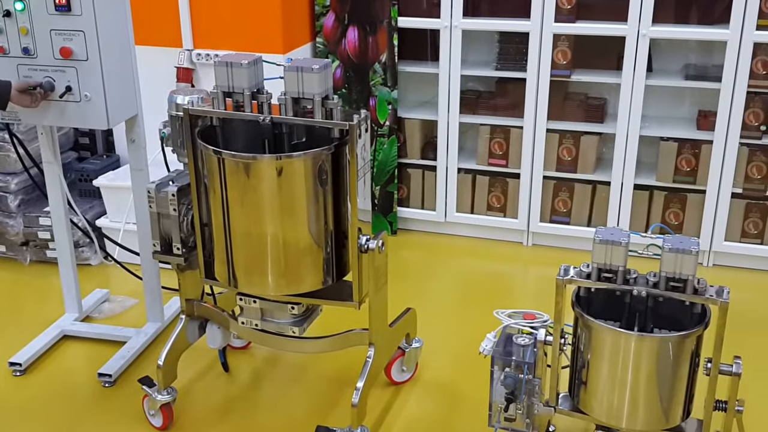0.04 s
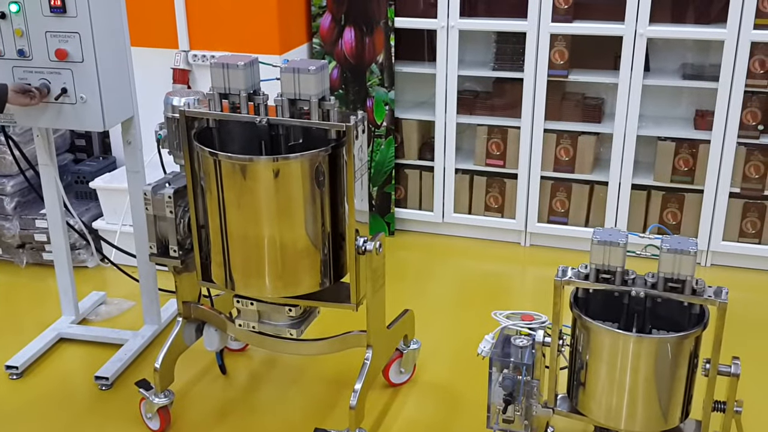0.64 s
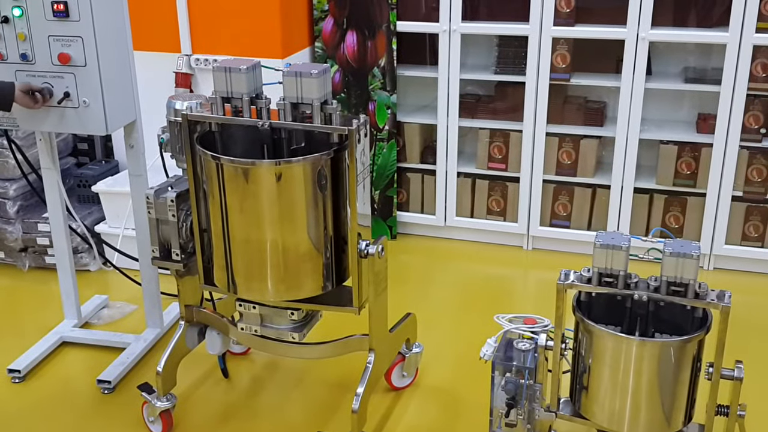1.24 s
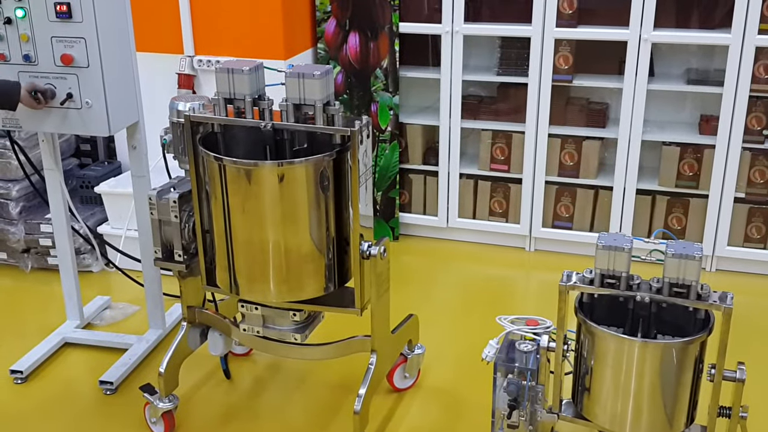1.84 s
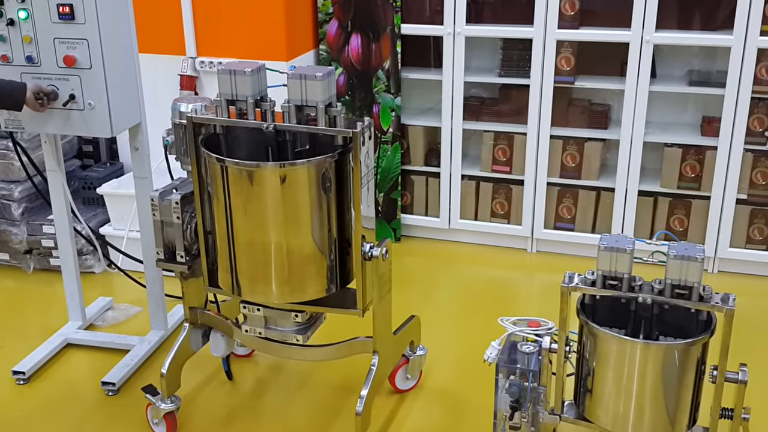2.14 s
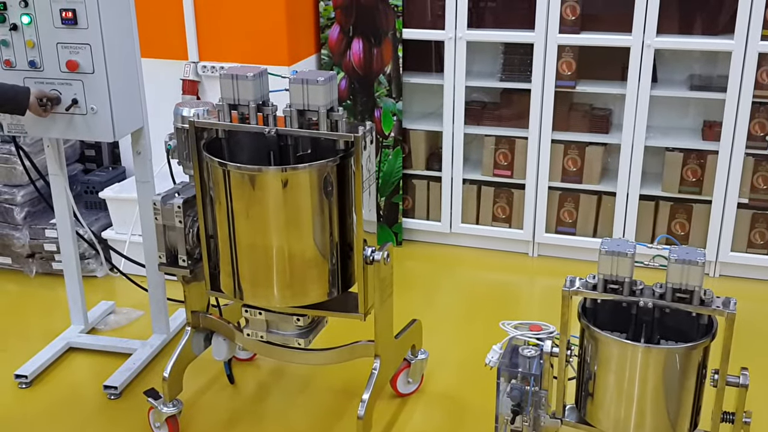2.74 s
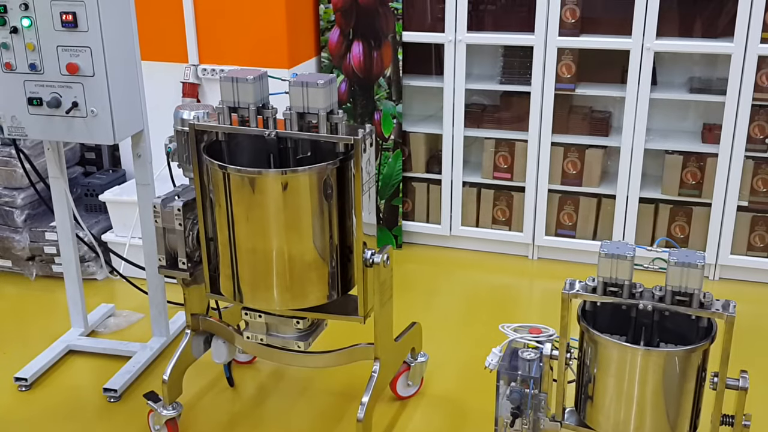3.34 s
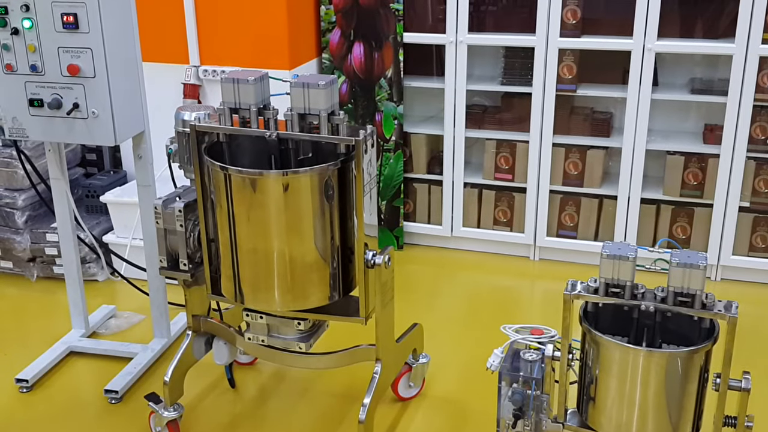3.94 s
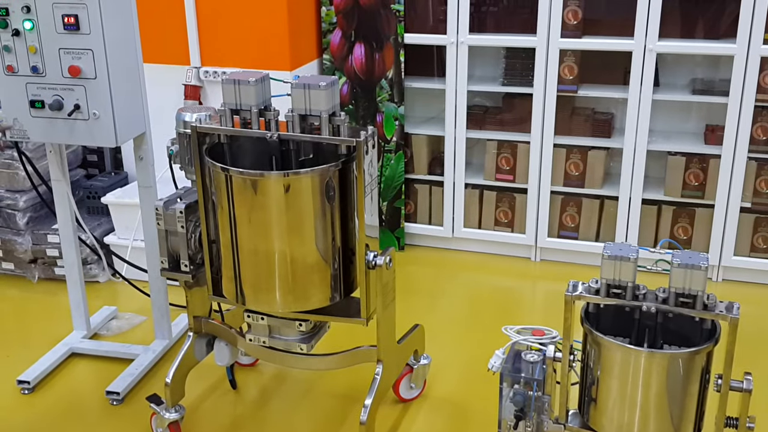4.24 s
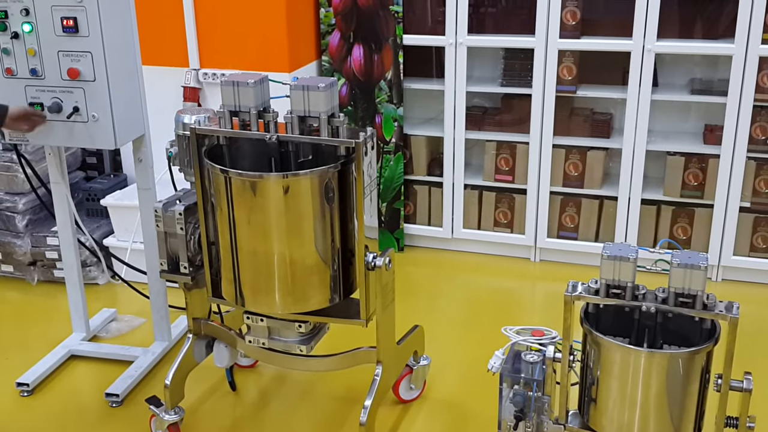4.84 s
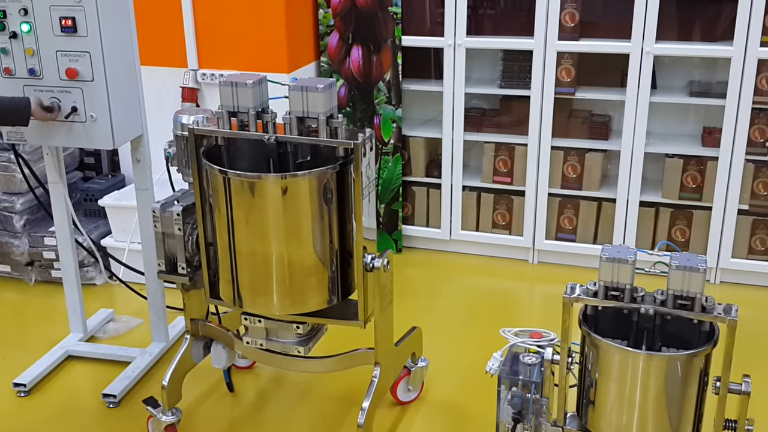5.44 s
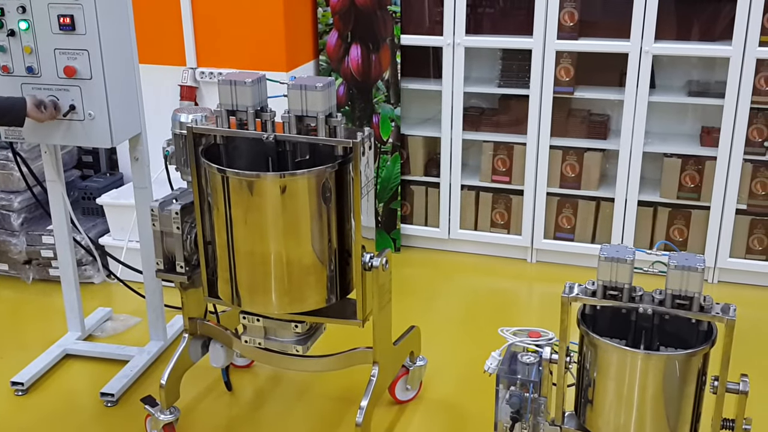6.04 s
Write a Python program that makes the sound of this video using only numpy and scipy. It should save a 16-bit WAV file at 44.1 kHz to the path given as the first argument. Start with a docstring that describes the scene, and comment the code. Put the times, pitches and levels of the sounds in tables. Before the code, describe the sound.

Heard from a few steps away in a showroom, a grinding machine makes a continuous low, ringing drone that pulses slightly as its steel drum turns. Paste hisses under the stone rollers and the motor gives off a very high whine, toward the right. Short, dry bearing squeaks come and go. Near the end, a quick cluster of cracking knocks comes with a faint rustle while the machine keeps running.

```python
"""In a showroom, a stone chocolate grinder runs a few steps from the microphone.
Granite rollers excite the resonances of a turning steel drum and its stand; the rumble swells about
every 0.7 s, over the hiss of sheared paste and the knock of breaking nibs. The motor's inverter whines
near 9.5 kHz from the right, a dry bearing chirps now and then, and soft rustles come late."""
import sys
import numpy as np
from scipy import signal
from scipy.fft import rfft, irfft
from scipy.io import wavfile
from scipy.ndimage import uniform_filter1d

SR = 44100
rng = np.random.default_rng(int(sys.argv[2]) if len(sys.argv) > 2 else 0)


def persist_wave(psi):
    """Save psi, clipped to +-1, as 16-bit WAV."""
    counts = np.round(np.clip(psi, -1, 1) * 32767).astype(np.int16)
    wavfile.write(sys.argv[1], SR, np.atleast_2d(counts).T)


N = 273420
T, HZ = np.arange(N) / SR, np.fft.rfftfreq(N, 1 / SR)


def amp(db):
    """Amplitude ratio of a level in decibels."""
    return 10 ** (np.asarray(db) / 20)


def unit(x):
    """Normalisation to rms 1."""
    return x / np.sqrt(np.mean(x ** 2) + 1e-20)


def at_hz(points, hz):
    """Interpolation on a log-frequency axis."""
    f, value = np.transpose(points)
    return np.interp(np.log(hz + 1), np.log(f + 1), value)


def curve(points):
    """Linear interpolation in time."""
    return np.interp(T, *np.transpose(points))


def drift(rate_hz):
    """Low-pass random fluctuation of rms 1."""
    return unit(irfft(rfft(rng.standard_normal(N)) * np.exp(-(HZ / rate_hz) ** 2) * (HZ > 0), N))


def band_noise(hz, width_hz, shape=N):
    """Noise in a Gaussian band, of rms 1."""
    return unit(irfft(rfft(rng.standard_normal(shape)) * np.exp(-((HZ - hz) / width_hz) ** 2), N))


# balance of the two microphone ports (frequency [Hz], left minus right [dB])
BALANCE = [(60, 0.5), (220, -1.5), (350, -1), (500, 0), (1100, -1), (1500, -3.5), (2100, -7), (2900, -1.5),
           (4400, -5), (5400, -5.5), (6500, -25), (10500, -15), (11800, -1), (15000, -4.5)]
def ports(hz):
    """Level difference as left and right gains: the treble favours the right."""
    side = amp(at_hz(BALANCE, hz))
    return np.array([side, np.ones_like(side)]) / np.sqrt((1 + side ** 2) / 2)


# likeness of the ports (frequency [Hz], coherence [0 to 1])
COHERENCE = [(60, .993), (150, .99), (235, .97), (320, .86), (500, .77), (800, .55), (1200, .25),
             (3000, .15), (15000, .1)]
def noise(colour, lead_s=0.0002705, lead_above_hz=1070):
    """Partial coherence: stereo noise is alike in the bass and diffuse in the treble."""
    left, independent = rfft(rng.standard_normal((2, N)))
    same = np.clip(at_hz(COHERENCE, HZ), 0, 1)
    lag_s = lead_s * (1 - np.exp(-(HZ / lead_above_hz) ** 4))  # the left leads, except in the bass
    right = (same * left + np.sqrt(1 - same ** 2) * independent) * np.exp(-2j * np.pi * HZ * lag_s)
    pair = irfft(np.array([left, right]) * ports(HZ) * colour, N)
    return pair / pair.mean(0).std()


def ringing(modes, steadiness):
    """Forced resonance: random contact forces drive modes; steady rolling evens out the surges."""
    power = sum(amp(db) ** 2 / (1 + ((HZ - hz) / width) ** 2) ** 2 for hz, width, db in modes)
    radiation = 1 - np.exp(-(HZ / 36) ** 2)  # weak in the deep bass
    pair = noise(np.sqrt(power) * radiation)
    surge = uniform_filter1d(uniform_filter1d(pair.mean(0) ** 2, size=3500), size=2500)
    return pair / surge ** (steadiness / 2)


def wandering(pair, share):
    """Frequency modulation: modes slide by a share of their pitch as the rollers shift on the paste."""
    place = np.arange(N) + np.cumsum(share * drift(rate_hz=3.54))
    return np.array([np.interp(place, np.arange(N), side, period=N) for side in pair])


# the rollers bearing down (start [s], end [s], load while held [dB], load after [dB])
TURNS = [(0.007, 0.245, 1.5, -0.9), (.52, 1.29, 0.6, -2), (1.48, 1.92, 1.4, -3), (2.176, 2.565, 2, -4),
         (2.832, 3.203, 2, -4.5), (3.527, 3.91, 2, -4), (4.214, 4.675, 1.5, -3.5),
         (5.017, 5.293, 3.5, -2.5), (5.695, 5.915, 2.5, -0.7)]
LAG_S = 0.027  # hubs and paste trail the load
def load(lag_s=0, build_s=0.063, release_s=0.084):
    """Cyclic loading, in relative dB: once a turn the load builds, holds and lets go."""
    load_db = last_db = TURNS[0][3]
    for start, end, held_db, slack_db in TURNS:
        build = (1 + np.tanh((T - lag_s - start) / build_s)) / 2
        release = (1 + np.tanh((T - lag_s - end) / release_s)) / 2
        load_db = load_db + (held_db - last_db) * build + (slack_db - held_db) * release
        last_db = slack_db
    return load_db


# modes of the stones and of their hubs (frequency [Hz], width [Hz], relative level [dB])
STONE_MODES = [(444.5, 16, -1), (424, 18, -7), (478.8, 15.7, 1), (514, 15, -5), (540, 28, -10),
               (554.4, 17, -1.5), (613, 17, -10.5), (619, 43, -5.5), (666, 17.5, -7.5)]
HUB_MODES = [(713, 49, 0.5), (778, 94, -0.5), (817, 20, 2), (894, 9, 3.5), (920, 4.3, -4.5), (994, 85, -7)]
def rollers():
    """Rolling contact: stone on stone swells with the load; the stiffer hubs resonate higher."""
    stones = wandering(ringing(STONE_MODES, steadiness=0.23), share=0.01402)
    hubs = ringing(HUB_MODES, steadiness=0.3)
    return amp(-31.5 + 1.2 * load()) * stones + amp(-38.5 + 0.5 * load(LAG_S)) * hubs


# the drum's two main resonances (frequency [Hz], width [Hz], relative level [dB])
BOOM_MODES = [(217.8, 3.8, 7.7), (232.7, 17.4, 14), (252, 25, 0.46)]
RING_MODES = [(282, 14.3, -3.5), (320, 10.7, 0.5), (331.4, 21, -3), (350.4, 11, -3), (378.8, 17.7, -1.5)]
# roller jolts (time [s], half length [s], boom rise [dB], ring rise [dB])
JOLTS = [(0.16, 0.13, 5, -1), (0.805, 0.14, 1.5, 2.5), (1.058, 0.04, 7.5, 2), (1.216, 0.089, 2, 2.5),
         (1.734, 0.029, 6.5, 6), (1.957, 0.023, 6, 2), (2.345, 0.039, -3, 6.5), (3.17, 0.3, 4.5, 1),
         (3.786, 0.05, 2, 5), (3.997, 0.08, 7, 4.5), (4.59, 0.078, 8.5, -3), (4.7, 0.066, 7.5, -0.5),
         (5.253, 0.044, -4, 8.5)]
def drum():
    """Shell resonance: the drum booms and rings, flaring when a roller jolts it."""
    boom_db, ring_db = sum(np.outer(rises_db, np.exp(-((T - s) / length) ** 2))
                           for s, length, *rises_db in JOLTS)
    boom = ringing(BOOM_MODES, steadiness=0.43)
    ring = wandering(ringing(RING_MODES, steadiness=0.067), share=0.012)
    return amp(-36 + boom_db + 0.053 * load()) * boom + amp(-31.5 + ring_db + load()) * ring


# modes of the stand (frequency [Hz], width [Hz], relative level [dB])
STAND_MODES = [(48.3, 3, -19), (69.6, 9.1, -8.5), (94, 18, -10), (109, 12, -2.5), (134.7, 5.8, 3.5),
               (146, 23, -6.5), (172.2, 8.4, 2), (175, 4.3, 0), (200, 5.3, -0.5)]
# its rumble before the load acts (time [s], level [dB])
RUMBLE = [(0, -41), (.28, -36), (.58, -44.5), (.9, -40.5), (1.8, -39.3), (2.7, -41), (3.3, -39.5),
          (3.7, -42), (4.5, -38.5), (4.95, -43), (6.2, -39.5)]
def stand():
    """Structure-borne vibration: the rollers shake the stand's low modes."""
    return amp(curve(RUMBLE) + 0.21 * load()) * ringing(STAND_MODES, steadiness=0.16)


# spectrum of the paste's hiss (frequency [Hz], relative density [dB])
PASTE_SPECTRUM = [(60, -50), (500, -54), (950, 1.5), (1150, 1), (1400, 0), (1650, -1), (2200, 0),
                  (2800, -4), (3250, -10), (3800, -11.5), (4300, -16.5), (5500, -17.5), (7000, -30),
                  (10000, -51)]
# its rasp before load and grit act (time [s], level [dB])
RASP = [(0, -40.5), (.32, -42.5), (1.15, -41.5), (2.05, -41.5), (2.43, -41), (2.9, -41.5), (4.1, -41.5),
        (4.72, -40), (5.15, -41), (5.65, -41.5), (6.2, -41)]
def paste():
    """Shear noise: the paste hisses a little louder under load, and grit makes it flutter."""
    level_db = curve(RASP) + 0.23 * load(LAG_S) + 0.5 * drift(rate_hz=31)
    return amp(level_db) * noise(amp(at_hz(PASTE_SPECTRUM, HZ)))


# modes of thin steel parts (frequency [Hz], width [Hz], relative level [dB])
STEEL_MODES = [(3540, 53, 3.5), (3940, 29, 6), (4600, 260, 1.5), (5430, 26, -1.5), (5690, 15, 6.5),
               (6240, 66, 2), (8100, 120, -9)]
def steel():
    """Forced vibration: the gears set thin steel humming."""
    return amp(-58.5) * ringing(STEEL_MODES, steadiness=0.1)


# larger nibs cracking (time [s], level [dB])
LARGE_NIBS = [(2.848, -22), (3.332, -24), (3.989, -18), (5.71, -18), (5.728, -12), (5.761, -15),
              (5.806, -21), (5.844, -18)]
def nibs(per_s=45, small_db=-35.5, crack_db=-18):
    """Impulse response: cocoa nibs break, more often under load, and each knock rings the stones."""
    chance = per_s / SR * amp(load()) ** 2
    knocks = (rng.random(N) < chance) * amp(small_db + 3.7 * np.clip(rng.standard_normal(N), -2, 1.5))
    for s, db in LARGE_NIBS:
        knocks[round(s * SR)] = amp(db)
    t, place = T[:SR // 8], rng.integers(0, 8, N)
    crack_band = signal.butter(2, [800, 3200], "band", fs=SR)
    out = np.zeros((2, N))
    for spot in range(8):  # each place on the drum's floor rings its own mix of modes
        ring = 0
        for hz, width, db in STONE_MODES:
            weight = amp(db) * (rng.standard_normal() + 1.46 * rng.standard_normal((2, 1)))
            ring += weight * np.sin(2 * np.pi * hz * t) * np.exp(-2 * np.pi * width * t)
        crack = signal.lfilter(*crack_band, rng.standard_normal((2, len(t))) * np.exp(-t / 0.0048))
        knock = ring / abs(ring).max() + amp(crack_db) * crack / abs(crack).max()
        out += signal.oaconvolve((knocks * (place == spot))[None], knock, axes=1)[:, :N]
    # the knocks carry no deep bass
    return signal.lfilter(*signal.butter(2, 220, "high", fs=SR), out)


def tone(hz, db, start_rad, wander_rad, flutter_db, left_db=-6):
    """Multipath: only reflections of a tone reach the left port; moving parts make both sides waver."""
    path_rad = np.array([[rng.uniform(0, 2 * np.pi)], [0]])
    phase = 2 * np.pi * hz * T + start_rad + path_rad + wander_rad * drift(rate_hz=11)
    left, right = ports(hz)
    gains = np.array([[amp(left_db) * left / right], [1]])
    return np.sqrt(2) * amp(db + flutter_db * drift(rate_hz=7.5)) * np.sin(phase) * gains


# switching sidebands (carrier multiple, offset [mains multiples]) and, for each, (base level [dB])
SIDEBANDS = [(1, -5), (1, -3), (1, -1), (1, 1), (1, 3), (1, 5), (2, -12), (2, -8), (2, -6), (2, -4),
             (2, -2), (2, 0), (2, 2), (2, 4), (2, 6), (2, 8), (3, -7), (3, 3), (3, 11)]
SIDEBAND_LEVELS = [-63, -57.5, -52, -60.5, -59.5, -62.5, -66, -58, -52, -54, -49, -56, -44, -44, -41, -55,
                   -71, -76, -75]
# contour, centred and scaled below, of the group at twice the carrier (time [s], level [dB])
WHINE_CONTOUR = [(0.0, -48.5), (0.48, -46.5), (0.95, -47.5), (1.45, -47.5), (1.9, -45.5), (3.25, -45.5),
                 (3.55, -47), (3.7, -46), (4.3, -46.5), (4.7, -48), (5.33, -51.5), (5.7, -48.5), (6.2, -49)]
# the hand-held microphone drifts through standing waves (time [s], place [-1 to 1])
SWAY = [(0, -1), (.55, .4), (1.45, 1), (2.2, 0.17), (3.3, -1), (4.2, -0.39), (4.85, -0.61), (5.3, -.2),
        (5.7, 0.8), (6.2, .5)]
# sidebands this affects (offset [mains multiples]) and, for each, (gain at place 1 [dB])
SWAYED_OFFSETS = [-6, -4, -2, 2, 4]
SWAY_GAINS = [1, -6, 4, 1.5, -1]
def inverter(carrier_hz=4690.75, mains_hz=50, twist_rad=0.292):
    """Modulation: windings sing at multiples of the switching rate, split into sidebands by the mains."""
    contour_db, sway = curve(WHINE_CONTOUR), curve(SWAY)
    swell_db = 0.82 * (contour_db - contour_db.mean())
    sway_db = dict(zip(SWAYED_OFFSETS, SWAY_GAINS))
    out = np.zeros((2, N))
    for (multiple, offset), db in zip(SIDEBANDS, SIDEBAND_LEVELS):
        hz = multiple * carrier_hz + offset * mains_hz
        # the mains sweeps the pulse width, so the whine swings in pitch more than in level
        start_rad = twist_rad * offset ** 2
        if multiple == 2:
            level_db = db - 0.6 + swell_db + sway * sway_db.get(offset, 0)
            out += tone(hz, level_db, start_rad, wander_rad=0.2, flutter_db=0.8, left_db=-5)
        else:
            out += tone(hz, db - 0.5, start_rad, wander_rad=0.31, flutter_db=0.5, left_db=-5.5)
    return out


def shadow(late_s, turn_s=0.705, dip_at_s=0.82, depth_db=-6):
    """Acoustic shadow, in dB about its mean: the drum shades a tone once a turn."""
    dip = np.cos(np.pi * (T - dip_at_s - late_s) / turn_s) ** 6
    return depth_db * (dip - dip.mean())


# steady motor tones (frequency [Hz], base level [dB])
MOTOR_TONES = [(1759, -59), (2310.8, -61), (2795.3, -60), (2954.1, -61), (4565, -67), (4865.2, -62),
               (5345.6, -64), (6293, -67.5), (6886.6, -67), (7085.8, -69), (7286.3, -64), (8306.4, -60),
               (8599.8, -59), (8706.1, -61), (8799, -61), (9105, -65), (9531.1, -62), (9632, -64),
               (9657.6, -59), (9739.7, -64), (9797.6, -60), (9862.2, -55), (9912, -67), (9970, -66),
               (10061, -68), (10161, -69), (10261, -71), (10463.8, -64), (14406, -77), (14546, -78)]
# two thin whines that come and go (time [s], level [dB])
LOW_WHINE = [(0, -49), (.28, -58), (.48, -56), (.8, -57), (1.0, -59), (1.4, -55), (1.56, -64), (2.05, -53),
             (2.28, -66), (2.66, -56.5), (2.82, -62), (2.97, -53), (3.15, -63), (3.5, -68), (3.68, -55),
             (3.95, -65), (4.75, -65), (4.9, -54.5), (5.15, -70), (5.56, -55), (5.72, -61), (6.15, -54.5)]
HIGH_WHINE = [(0, -58), (1.3, -66), (1.9, -59), (2.6, -55), (3.4, -50), (4.05, -53.5), (4.7, -61),
              (6.2, -62)]
def motors(low_hz=5321.4, high_hz=8899.9):
    """Tonal radiation: faint motor tones, all but the low whine shaded by the turning drum."""
    tones = np.zeros((2, N))
    for hz, db in MOTOR_TONES:
        level_db = db - 0.5 + shadow(late_s=0.11 * rng.standard_normal())
        tones += tone(hz, level_db, rng.uniform(0, 2 * np.pi, (2, 1)), wander_rad=0.33, flutter_db=3)
    low = tone(low_hz, curve(LOW_WHINE), 0, wander_rad=0.35, flutter_db=2.5, left_db=-13)
    high_db = curve(HIGH_WHINE) + 1.4 * shadow(late_s=0.044)
    high = tone(high_hz, high_db, 0, wander_rad=0.25, flutter_db=2.3, left_db=-10)
    return tones + low + high


# spectrum of the background hiss (frequency [Hz], relative density [dB])
HISS_SPECTRUM = [(20, -23), (60, -7), (300, 11.5), (1000, 11.5), (3000, -0.5), (5000, -3.5), (7400, -1.5),
                 (8300, 3.5), (9700, 4.5), (10400, -5), (10950, -22), (11600, -17.5), (12500, -13.5),
                 (14500, -8), (15500, -18)]
def background_hiss():
    """Broadband noise: a steady hiss, with a gap near 11 kHz that is not the machine's sound."""
    return amp(-45) * noise(amp(at_hz(HISS_SPECTRUM, HZ)))


# showroom echoes (delay [s], level [dB])
ECHOES = [(.0065, 2), (.025, -7), (.051, -1.5), (.088, -11)]
def room(x, t60, tail_db, spread_s=0.0004):
    """Reverberation: echoes from floor, walls and glass doors, over a diffuse tail."""
    t = T[:SR]
    tail = rng.standard_normal((2, SR)) * np.exp(-np.log(1000) * t / t60) * (t > 0.012)
    wet = x.std() * amp(tail_db) * unit(signal.fftconvolve(x[None], tail, axes=1)[:, :N])
    for s, db in ECHOES:
        for side in wet:
            delay = round((s + spread_s * rng.random()) * SR)
            side[delay:] += amp(db) * x[:N - delay]
    return wet


# bearing slips (time [s], squeal level [dB], clank level [dB])
SLIPS = [(.204, -41.5, -49), (.318, -36, -43), (.836, -43, -56), (1.052, -42, -49), (1.158, -38.5, -50),
         (1.475, -40, -50), (1.850, -47, -59), (1.947, -39, -45), (2.170, -46, -54), (2.502, -47, -58),
         (2.710, -48, -60), (3.923, -42.5, -57), (4.025, -40.5, -47), (4.326, -49, -60), (4.654, -41, -46),
         (4.739, -39.5, -60), (4.839, -35, -43), (4.933, -40, -51), (5.034, -47, -57), (5.132, -44, -47),
         (5.246, -38, -50)]
# squeal modes (frequency [Hz], relative level [dB], 60 dB decay time [s], room gain [dB])
SQUEAL_MODES = [(3508, -1.5, 0.041, 2.5), (3547, -16.5, 0.041, 4), (3840, -22, .02, -3),
                (8020, -0.5, 0.012, -7)]
def bearing(rub_s=0.0045, clank_hz=3730, clank_decay_s=0.0093):
    """Friction excitation: each slip builds up the squeal modes; hard slips start with a rough clank."""
    out = np.zeros((2, N))
    for hz, mode_db, t60, room_db in SQUEAL_MODES:
        squeal = np.zeros(N)
        grit = drift(rate_hz=280)
        for (s, db, _), detune in zip(SLIPS, rng.standard_normal(len(SLIPS))):
            start = round(s * SR)
            t = T[:min(SR // 8, N - start)]
            span = slice(start, start + len(t))
            envelope = np.minimum(t / rub_s, 1) * np.exp(-np.log(1000) * np.maximum(t - rub_s, 0) / t60)
            # the rough pitch sinks as the slip comes to rest
            pitch_hz = hz * (1 + 0.0033 * detune) + 15 * grit[span] + 40 * np.exp(-t / rub_s)
            phase = 2 * np.pi * np.cumsum(pitch_hz) / SR
            squeal[span] += amp(db + mode_db) * envelope * np.sqrt(2) * np.sin(phase)
        out += ports(hz)[:, None] * (squeal + amp(room_db) * room(squeal, t60=0.8, tail_db=1))
    blows = sum(amp(db) * (T > s) * np.exp(-abs(T - s) / clank_decay_s) for s, _, db in SLIPS)
    clank = blows * band_noise(clank_hz, width_hz=190)
    return out + ports(clank_hz)[:, None] * (clank + room(clank, t60=0.6, tail_db=0))


# soft rubs (time [s], half length [s], centre [Hz], width [Hz], level [dB], left minus right [dB])
RUSTLES = [(3.73, .016, 12000, 1400, -61, -6), (4.65, 0.22, 13120, 2200, -63, -8),
           (5.33, .022, 12000, 2400, -55.5, -10), (5.6, 0.63, 12400, 2200, -62, -10),
           (5.79, 0.048, 2000, 2200, -37.5, -5), (6.15, 0.15, 13400, 2180, -55.5, -10)]
def rustles():
    """Friction noise: brief, grainy swells of hiss."""
    out = np.zeros((2, N))
    for s, length, hz, width, db, pan_db in RUSTLES:
        hiss = band_noise(hz, width, shape=(2, N))
        swell = np.exp(-((T - s) / length) ** 2) * amp(db + 2 * drift(rate_hz=130))
        out += hiss * swell * unit(amp([[pan_db], [0]]))
    return out


def scene():
    """Superposition: the running machine and the background add."""
    grinding = rollers() + drum() + stand() + paste() + steel() + nibs()
    return grinding + inverter() + motors() + background_hiss() + bearing() + rustles()


def record(dry, top_hz=15520):
    """Band limiting: a steep low-pass removes the highest treble."""
    lowpass = signal.firwin(801, top_hz, window=("kaiser", 9), fs=SR)
    return signal.oaconvolve(dry, lowpass[None], "same")


dry = scene()
out = record(dry)
persist_wave(out)
```